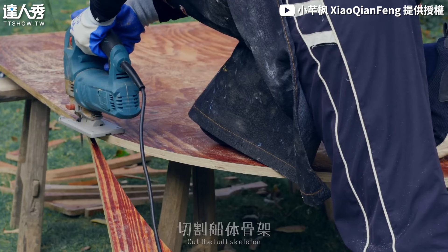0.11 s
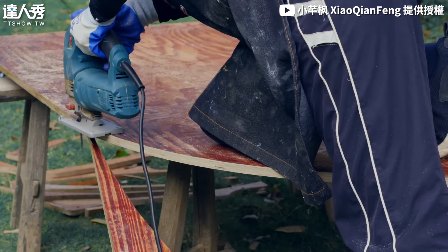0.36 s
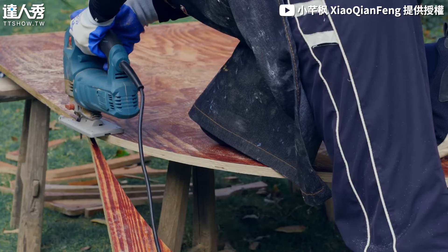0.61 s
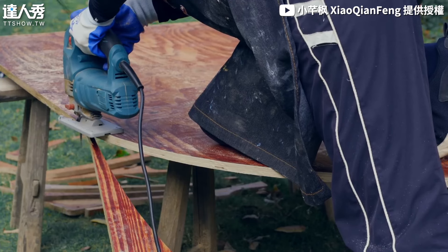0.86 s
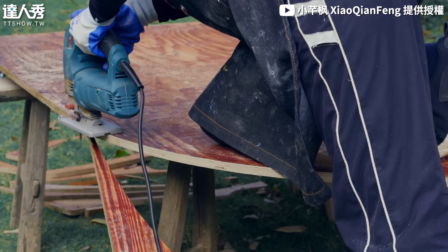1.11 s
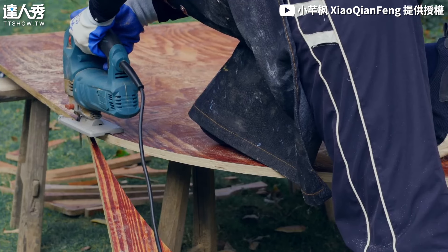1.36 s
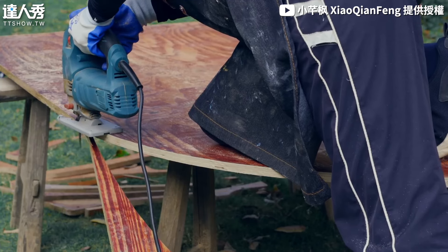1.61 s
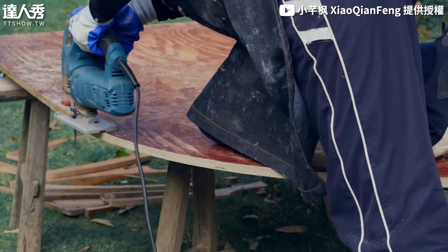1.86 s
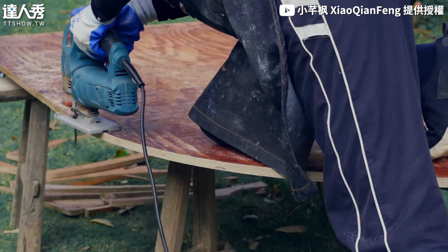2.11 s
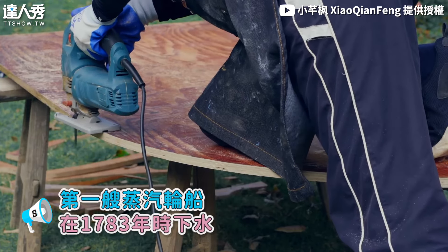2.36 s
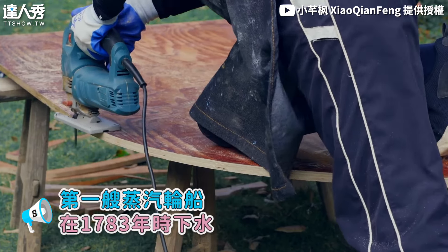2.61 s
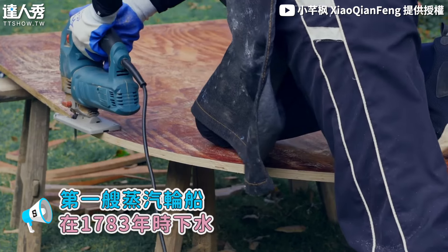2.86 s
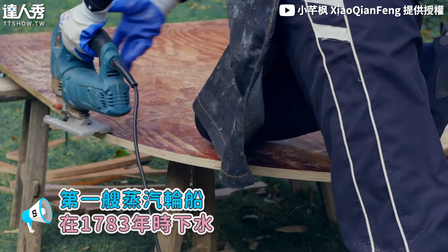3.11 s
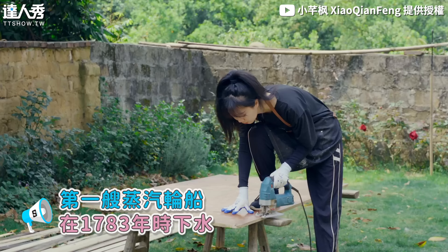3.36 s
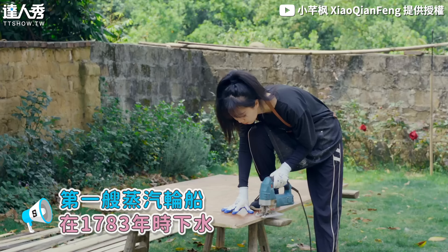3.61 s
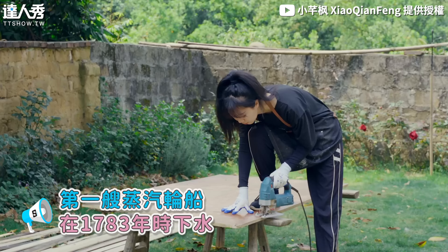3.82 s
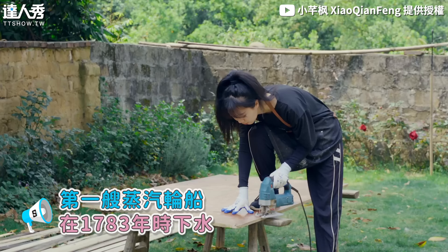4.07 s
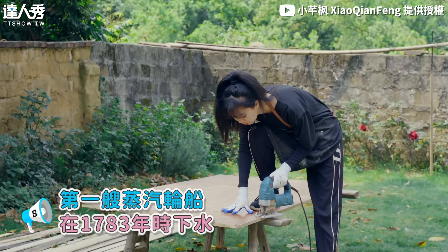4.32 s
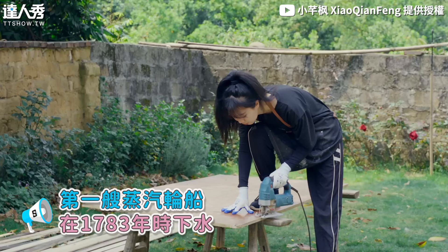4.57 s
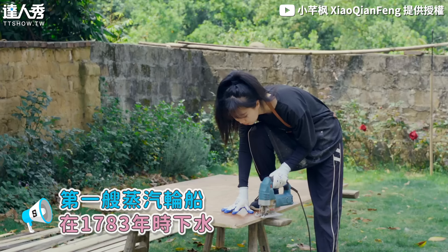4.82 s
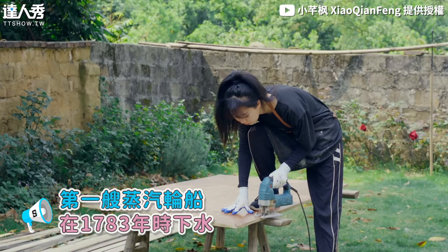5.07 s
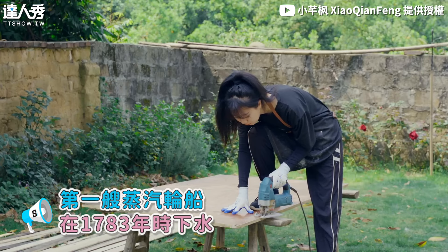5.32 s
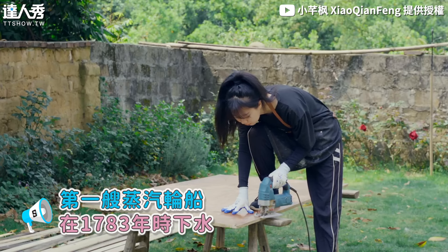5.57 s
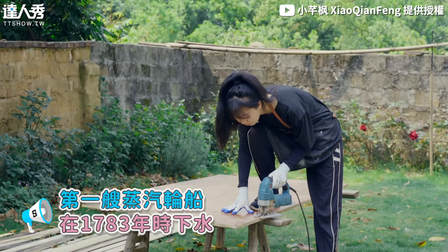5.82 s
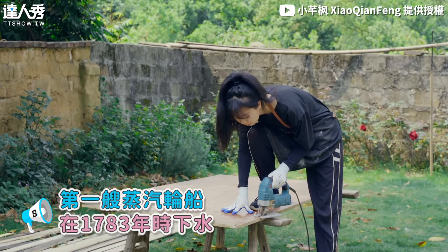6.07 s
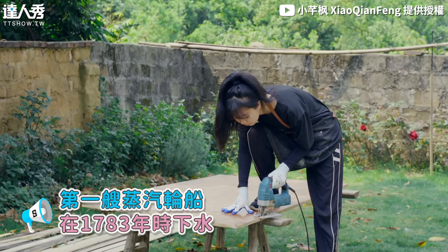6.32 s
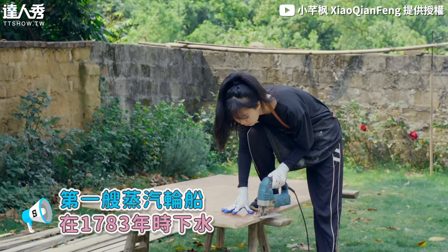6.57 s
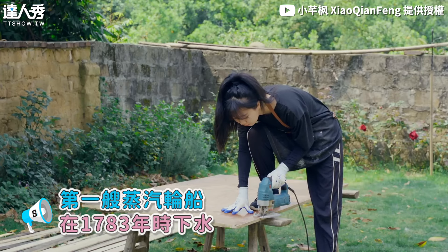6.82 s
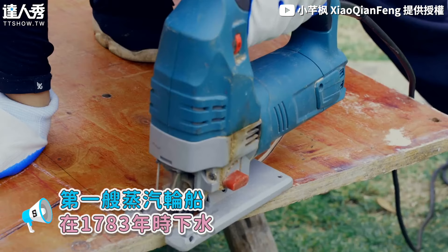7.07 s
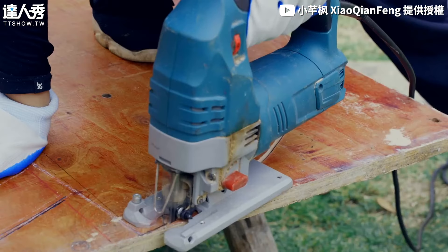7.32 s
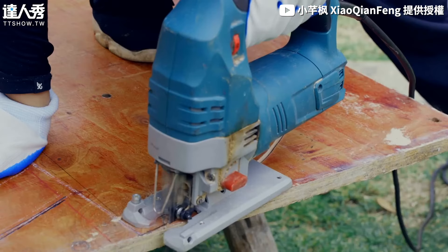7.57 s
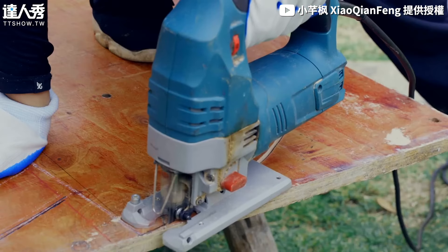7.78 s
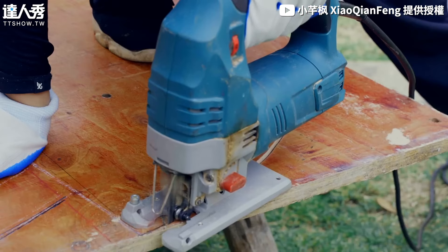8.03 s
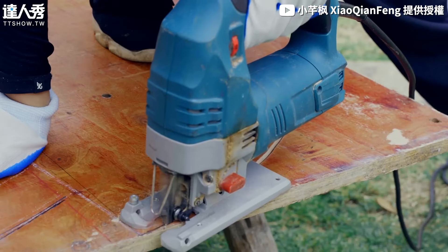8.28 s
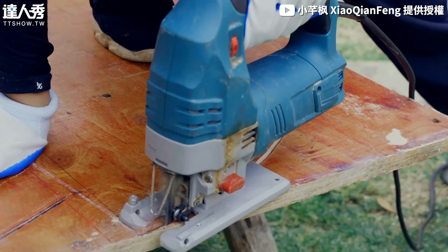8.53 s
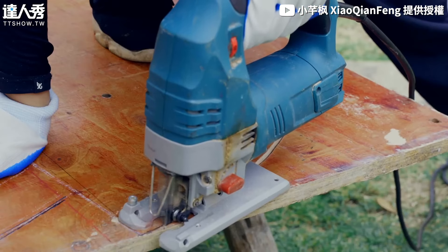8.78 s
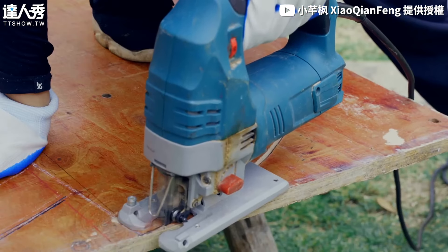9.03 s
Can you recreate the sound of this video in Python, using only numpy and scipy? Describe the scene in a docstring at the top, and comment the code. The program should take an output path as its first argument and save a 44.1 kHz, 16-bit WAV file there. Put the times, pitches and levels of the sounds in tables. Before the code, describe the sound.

An electric jigsaw roars close by, coasts down with rattling base-plate knocks, restarts, slows again, then cuts steadily farther off and finally near.

```python
"""An electric jigsaw cuts a wooden board outdoors, heard in three joined stretches.
Close by, the motor coasts down amid base-plate knocks and restarts, then coasts again while a farther,
steady cut fades in; a hard cut then jumps to a near, steady cut in which the board drones with the strokes.
Noise shaped by teeth and body makes the roar; sines locked to one shaft make stroke drone and whines;
filtered noise bursts make the knocks."""
import sys
import numpy as np
from scipy import signal
from scipy.io import wavfile
from scipy.ndimage import uniform_filter1d

SR = 44100
rng = np.random.default_rng(int(sys.argv[2]) if len(sys.argv) > 2 else 0)


def wrap_up_sound(samples):
    """Save the sound to the file named by the first command line argument, as 16-bit audio."""
    columns = np.atleast_2d(samples).T
    # keep every value between -1 and 1, then stretch to whole-number steps
    tamed = np.clip(columns, -1, 1)
    steps = np.round(tamed * 32767).astype(np.int16)
    wavfile.write(sys.argv[1], SR, steps)


def magnitude_from_level(level_db):
    """Linear magnitude for a level in decibels (20 dB per decade)."""
    exponent = np.asarray(level_db, float) / 20
    return 10 ** exponent


N = 403956  # length in samples
SHAFT_TURNS_PER_STROKE = 86 / 8

# how each stretch reaches the microphones, and its bite, one row a stretch: left_minus_right_db,
# left_lead_samples, stroke_throb (0-1, at running speed), chip_bursts_db (re the steady rasp),
# repeating_pattern_db (re the rasp, at running speed), shaft_twist_turns (peak, twice a stroke)
PLACE = [(-0.8, 0.36, 0.06, -10.5, -5.5, 0.0068), (-1.85, 2.54, 0.16, -16.5, -11, 0.0016),
         (-0.5, .1, 0.14, -9, -7, .002)]
# cutting roar at full speed, one list a stretch: time_s, level_db (1.2-4 kHz, ahead of the dip),
# board_thrum_db (tilt of the bass)
CUT = [
    [(0, -22.5, 1.5), (.3, -22, 1), (.8, -22.5, 1.5), (1.1, -24, 3), (1.65, -23, 1), (1.85, -24.5, 3),
     (2.7, -26, -0.5), (3.3, -22.5, -1)],
    [(2.9, -29.5, 1.5), (3.8, -28.5, -0.5), (4.55, -29, 0), (4.9, -26.5, -2.5), (5.3, -27, -1.5),
     (5.65, -28, 1.5), (6.05, -27, -2), (6.75, -28, -2), (7.09, -28.5, 6)],
    [(7.09, -27.5, 1), (9.16, -28, 2.5)],
]


def evened(x):
    """Scales a signal to unit rms."""
    return x / np.sqrt(np.mean(x ** 2) + 1e-20)


def read(points, hz):
    """Reads a (frequency, value) table along a logarithmic frequency axis."""
    table_hz, value = np.transpose(points)
    return np.interp(np.log(hz + 1), np.log(table_hz + 1), value)


def curve(rows, t):
    """Reads every column of a table against its first, in straight lines."""
    at, *columns = np.transpose(rows)
    return [np.interp(t, at, column) for column in columns]


def drift(n, per_s):
    """Slow chance of about unit spread; a higher per_s wanders faster."""
    knots_per_s = 40
    knots = rng.standard_normal(int(n / SR * knots_per_s) + 80)
    smooth = evened(signal.lfilter([1], [1, -np.exp(-per_s / 6)], knots)[40:])
    return np.interp(np.arange(n) / SR * knots_per_s, np.arange(len(smooth)), smooth)


def later(k, t):
    """Rises from 0 to 1 as the cut moves on from its early to its late sound."""
    # middle of the turn, one a stretch: time_s
    turn_s = (1.1, 5.18, 8.26)
    return .5 + .5 * np.tanh((t - turn_s[k]) / 0.14)


def speed_share(k, t):
    """Share of the running speed: an even proportional loss while coasting, a quick recovery under power."""
    # the trigger is let go in the first stretch: release_s, press_s, loss_rate_per_s (share of speed)
    coasts = [(.1824, .8096, 1.119), (1.97, 3.4, .884)]
    spin_up_s = .134
    share = np.ones(len(t))
    if k > 0:
        return share
    for release_s, press_s, loss_rate in coasts:
        lost = 1 - np.exp(-loss_rate * np.clip(t - release_s, 0, press_s - release_s))
        recovery = np.exp(-np.maximum(t - press_s, 0) / spin_up_s)
        share = share * (1 - lost * recovery)
    return share


def response(k, hz):
    """Gain of the saw and board: broad colour with the resonances standing on it."""
    # colour of the roar, one list a stretch: frequency_hz, density_db (relative)
    colour = [
        [(24, -82), (40, -67), (273, -26.5), (438, -17.5), (670, -13.5), (817, -10.5), (1050, -10.5),
         (2220, -2.5), (3300, -10), (5720, -15.5), (10400, -25.5), (14400, -28), (15500, -32)],
        [(24, -92), (40, -81), (280, -27.5), (397, -22.5), (427, -26), (606, -15.5), (704, -9.5), (1130, -7),
         (1680, -1.5), (5300, -10), (10900, -21.5), (13700, -23), (15500, -23)],
        [(24, -81), (40, -55), (188, -41), (253, -19.5), (301, -27.5), (461, -19), (637, -17.5), (838, -3),
         (1050, -12.5), (2160, -3.5), (10700, -20.5), (14400, -23.5), (15500, -33)],
    ]
    # resonances of board, base plate and housing, one list a stretch: centre_hz, width_hz, peak_db (relative)
    body = [
        [(423.3, 33, -11.5), (812, 44, -8), (1304, 224, -5.5), (1595, 230, -4), (2247, 71, 3), (2885, 180, -5),
         (3490, 68, -9.5), (5810, 130, -12), (7770, 460, -20.5)],
        [(442.5, 15, -12), (820, 150, -13), (1700, 49, -28), (1920, 25, -10), (2196, 280, -0.5),
         (2479, 63, 4.5), (2905, 44, 3), (3420, 160, -6.5), (5240, 130, -5.5)],
        [(251, 18, -19), (444, 21, -29), (880, 90, -9), (1277, 150, -5), (2160, 410, -3), (2650, 62, -8),
         (3220, 99, -4.5), (3600, 110, -3), (3990, 110, -19), (4800, 180, -7), (5680, 1060, -10),
         (7500, 150, -12.5)],
    ]
    peaks = sum(magnitude_from_level(db) ** 2 / (1 + (2 * (hz - f) / width) ** 2) ** 2 for f, width, db in body[k])
    return np.sqrt(magnitude_from_level(read(colour[k], hz) - 4.0) ** 2 + 0.57 * peaks)


def knocks():
    """The base plate knocks on the board while the motor is slow: short bright bursts through the housing."""
    # one row a knock: start_s, level_db (rms at its start)
    blows = [(0.3915, -25), (0.412, -28), (0.4434, -31), (0.5322, -28), (0.5636, -28), (0.5994, -24.5),
             (0.631, -31), (0.8594, -25), (0.8929, -24), (0.9423, -28.5), (0.97, -27)]
    length = 900
    out, t = np.zeros((2, N)), np.arange(length) / SR
    bright = signal.butter(4, [2500, 8500], "band", fs=SR, output="sos")
    decay = magnitude_from_level(-60 * t / 0.028)  # 60 dB in 28 ms
    for start_s, level_db in blows:
        shared = 1.5 * rng.standard_normal(length)
        burst = signal.sosfilt(bright, rng.standard_normal((2, length)) + shared)
        first = round(start_s * SR)
        out[:, first:first + length] += magnitude_from_level(level_db) * evened(burst) * decay
    return out


def tone(turns, db, spread, flutter_db):
    """A sine of wavering level; it reaches the two sides with a different phase (spread in radians)."""
    start = 2 * np.pi * rng.random() + np.array([[0], [spread * rng.standard_normal()]])
    level = np.sqrt(2) * magnitude_from_level(db + flutter_db * drift(len(turns), 4.0))
    return level * np.sin(2 * np.pi * turns + start)


def fan_whine(k, turns, share, t):
    """Each fan blade chops the air once a shaft turn; the whine fades as the shaft slows."""
    # whine ahead of the fade with speed, one list a stretch: time_s, level_db
    fan = [
        [(0, -39), (.1, -37.5), (1.97, -36)],
        [(2.9, -47), (3.6, -50.5), (3.85, -46), (4.08, -56), (4.45, -54.5), (4.7, -66.5), (5.0, -49),
         (5.4, -46), (5.75, -41.5), (6.0, -55), (6.28, -61), (6.6, -37), (7.09, -49)],
        [(7.09, -46), (8.5, -40.5), (9.16, -46)],
    ]
    # fade with speed: speed_share (of full speed), change_db
    fan_by_speed = [(.35, -26), (.55, -18), (.75, -14), (.92, -9), (.98, -5), (1, -2.5)]
    blades = 31
    level_db = curve(fan[k], t)[0] + curve(fan_by_speed, share)[0]
    return tone(blades * turns, level_db, spread=1.0, flutter_db=(2, 2, 1)[k])


def slot_whine(k, turns, shaft_hz):
    """Motor slots sing with overtones, growing as they slide down into the housing resonances."""
    # whine ahead of the housing's change, one a stretch: level_db
    slot_levels = (-51.5, -52, -55)
    # housing: pitch_hz, change_db
    slot_colour = [(2000, 0), (2500, 6), (2800, 15), (3300, 10), (4500, 4), (5200, 1), (5600, 0),
                   (5800, -7)]
    slots = 12
    level_db = slot_levels[k] + read(slot_colour, slots * shaft_hz)
    out = tone(slots * turns, level_db, spread=.3, flutter_db=(.8, 3, 3)[k])
    for order, below_db in ((2, -21), (4, -21), (5, -25)):
        audible = order * slots * shaft_hz < 16000
        out += audible * tone(order * slots * turns, level_db + below_db, spread=0.88, flutter_db=3)
    return out


def drone(k, strokes, shaft_hz, t, swing_db):
    """Stroke harmonics take the colour of the body as they slide; low ones are alike on both sides."""
    # what repeats with every stroke, shaft turn and gear tooth, one list a stretch:
    # multiple (of the stroke rate), early_db, late_db (rms, relative)
    harmonics = [
        [(2, -86, -86), (7, -62, -62), (8, -65, -65), (9, -60, -60), (10, -58, -58), (11, -59, -59),
         (18, -50, -50), (19, -47, -47), (27, -46, -46), (31, -44, -44), (34, -44, -44), (37, -44, -44),
         (45, -47, -47), (52, -37, -37), (71, -47, -47)],
        [(3, -89, -81), (5, -77, -73), (7, -65, -64), (10.75, -54, -55), (11, -61, -59), (12, -67, -60),
         (13, -68, -63), (16, -57, -57), (17, -56, -55), (18, -60, -50), (19, -55, -54), (20, -58, -50),
         (21, -55, -53), (33, -55, -49), (37, -53, -47), (39, -51, -44), (41, -58, -44), (42, -50, -41),
         (44, -48, -48), (48, -40, -47), (52, -42, -45), (54, -44, -46), (58, -63, -44), (61, -45, -44),
         (65, -50, -50), (72, -43, -58), (77, -52, -62), (78, -55, -48), (84, -53, -51), (88, -55, -52)],
        [(3, -80.5, -80.5), (6, -54.5, -58.5), (8, -65.5, -65.5), (9, -63.5, -67.5), (10, -63.5, -65.5),
         (10.75, -55.5, -58.5), (11, -61.5, -60.5), (14, -58.5, -63.5), (19, -39.5, -44.5), (20, -44.5, -41),
         (21, -50.5, -48.5), (23, -52.5, -50.5), (30, -44.5, -48), (32, -51.5, -50.5), (35, -66.5, -54.5),
         (36, -57.5, -54.5), (41, -50.5, -58.5), (45, -48.5, -49.5), (47, -48.5, -51.5), (58, -49.5, -46.5),
         (79, -66.5, -54.5), (86, -50.5, -52.5), (91, -55.5, -59.5), (172, -64.5, -59.5)],
    ]
    out, grid_hz = 0, np.geomspace(20, 16000, 600)
    colour_db = 20 * np.log10(response(k, grid_hz))
    for multiple, early_db, late_db in harmonics[k]:
        hz = multiple * shaft_hz / SHAFT_TURNS_PER_STROKE
        usual_db = np.interp(np.percentile(hz, 75), grid_hz, colour_db)
        slide_db = np.interp(hz, grid_hz, colour_db) - usual_db
        level_db = early_db + (late_db - early_db) * later(k, t)
        level_db = level_db + swing_db + 1.5 + np.minimum(slide_db, 3)
        spread = min(multiple / 40, .9)
        out = out + tone(multiple * strokes, level_db, spread, flutter_db=(3.5, 2.5, 1.3)[k])
    return out


def teeth(k, strokes, slowing):
    """Excitation: rasp that throbs twice a stroke, bursts of chips, and a pattern that each stroke repeats."""
    n, (throb, chip_db, pattern_db) = len(strokes), PLACE[k][2:5]
    depth = np.clip(throb + .5 * slowing, 0, .9)  # slow strokes stand out singly
    bite = 1 + depth * np.cos(4 * np.pi * strokes + .5 * drift(n, 4))
    bite += .05 * np.cos(2 * np.pi * strokes)
    struck = rng.random(n) < 300 / SR  # about 300 chips a second
    snaps = magnitude_from_level(2.3 * np.minimum(rng.exponential(1, n), 3)) * struck
    chips = evened(signal.lfilter([1], [1, -np.exp(-1 / (0.0012 * SR))], snaps))  # 1.2 ms decay
    rasp = rng.standard_normal(n) * (bite + magnitude_from_level(chip_db) * chips) * magnitude_from_level(.5 * drift(n, 16))
    pattern = rng.standard_normal(1024)[(strokes % 1 * 1024).astype(int)]
    return evened(rasp) + magnitude_from_level(pattern_db - 27 * slowing) * pattern


def coloured(k, a, b, t, patchy_db):
    """Two excitations become left and right, through the body.

    Thrum follows its own curve with slow wander; hiss falls with motor speed and mostly ignores
    the cutting level."""
    # likeness of left and right, one list a stretch: frequency_hz, likeness (0-1)
    likeness = [
        [(60, 0.99), (130, 0.98), (290, 1), (640, 0.78), (1410, 0.53), (3100, 0.47), (6820, 0.37), (15000, 0)],
        [(60, 0.65), (130, 1), (290, 0.82), (640, 0.78), (1410, 0.21), (3100, 0.51), (6820, 0), (15000, 0)],
        [(60, 0.95), (130, 1), (290, 0.99), (640, 0.97), (1410, 0.72), (3100, 0.75), (6820, 0.7), (15000, 0.16)],
    ]
    # midway through the far stretch the saw reaches another part of the board: frequency_hz, change_db
    move = [(60, 1), (110, 7), (200, 2), (400, -1), (600, -3), (720, 3.5), (900, -0.5), (1300, 0.5),
            (1560, -1), (1690, 4), (1800, -1.5), (1935, -1.5), (2090, 0), (2300, 0), (2450, 0), (2900, -1),
            (3500, 0.5), (6000, 0)]
    hiss_db_per_octave = 7.5  # further loss of cooling air hiss per octave of lost speed
    hiss_steady = 0.79  # share of the changes in cutting level that the air hiss ignores
    thrum_wander_db = 0.97
    hop = 256
    air = rng.standard_normal((2, len(t)))
    hz, frame_s, z = signal.stft([a, b, *air], SR, nperseg=1024, noverlap=1024 - hop)
    low, high = 1 / (1 + (hz / 1100) ** 4), 1 / (1 + (5000 / (hz + 1)) ** 4)
    steady = np.clip(0.41 * high, 0, 1)[:, None]  # air hiss does not follow the teeth
    za, zb = np.sqrt(1 - steady) * z[:2] + np.sqrt(steady) * z[2:]

    at = t[0] + frame_s
    cut_db, thrum_db = curve(CUT[k], at)
    thrum_db = thrum_db + thrum_wander_db * drift(len(at) * hop, 2.3)[::hop]
    hiss_db = hiss_db_per_octave * np.log2(speed_share(k, at)) - hiss_steady * cut_db
    tilt_db = np.outer(low, thrum_db) + np.outer(high, hiss_db - hiss_db.mean())
    if k == 1:
        tilt_db += np.outer(read(move, hz), later(k, at) - .5)
    patches = rng.standard_normal(za.shape[::-1])
    patches = evened(uniform_filter1d(uniform_filter1d(patches, 25, 0), 6, 1)).T

    same = np.clip(read(likeness[k], hz), 0, 1)[:, None]
    delay = np.exp(-2j * np.pi * hz * PLACE[k][1] / SR)[:, None]
    z = np.array([za, delay * (same * za + np.sqrt(1 - same ** 2) * zb)])
    z *= response(k, hz)[:, None] * magnitude_from_level(tilt_db + patchy_db * patches)
    return signal.istft(z, SR, nperseg=1024, noverlap=1024 - hop)[1][:, :len(t)]


def cutting_roar(k, strokes, slowing, t, load_db):
    """Teeth tear the wood through the body; the level is set by the load in the 1.2-4 kHz band."""
    left, right = teeth(k, strokes, slowing), teeth(k, strokes, slowing)
    roar = coloured(k, left, right, t, patchy_db=1.0)
    middle = signal.butter(4, [1200, 4000], "band", fs=SR, output="sos")
    band = signal.sosfilt(middle, roar.mean(0))
    return roar / band.std() * magnitude_from_level(load_db)


def stretch(k):
    """One continuous run of the saw: roar, stroke drone and motor whines on one shaft speed."""
    # shaft speed with the trigger held, sagging under load, one list a stretch: time_s, shaft_hz
    running = [
        [(0, 469.7), (1.045, 454.1), (1.77, 473.8), (1.97, 483.2)],
        [(2.9, 432.2), (3.6, 434.5), (4.1, 433.2), (4.5, 433.9), (5.2, 429.9), (5.65, 431.4), (6.05, 429.6),
         (6.4, 429.8), (7.09, 432.2)],
        [(7.09, 460.7), (7.5, 462.0), (8.1, 461.0), (9.16, 460.0)],
    ]
    roar_db_per_octave = 5  # loss of roar per octave of lost speed
    first = round(CUT[k][0][0] * SR)
    t = np.arange(first, min(round(CUT[k][-1][0] * SR) + 200, N)) / SR
    share = speed_share(k, t)
    shaft_hz = curve(running[k], t)[0] * share
    turns = np.cumsum(shaft_hz * (1 + .0006 * drift(len(t), 20))) / SR
    strokes, slowing = turns / SHAFT_TURNS_PER_STROKE, 1 - shaft_hz / shaft_hz.max()
    # each bite brakes the shaft
    turns = turns + PLACE[k][5] * np.sin(4 * np.pi * strokes + drift(len(t), 6))
    load_db = curve(CUT[k], t)[0] + roar_db_per_octave * np.log2(share)
    swing_db = load_db - np.percentile(load_db, 75) - 15 * slowing
    out = cutting_roar(k, strokes, slowing, t, load_db)
    out += drone(k, strokes, shaft_hz, t, swing_db)
    out += fan_whine(k, turns, share, t)
    out += slot_whine(k, turns, shaft_hz)
    return first, out * magnitude_from_level(PLACE[k][0] * np.array([[.5], [-.5]]))


def scene():
    """The first stretch cross-fades into the second; the third replaces it at once."""
    # cross-fade: start_s, end_s
    fade_s = (2.886, 3.41)
    # everything dims at the first join: time_s, change_db
    dip = [(2.7, 0), (3.0, -7), (3.2, -9.5), (3.8, 0.5)]
    mix, t = knocks(), np.arange(N) / SR
    share = np.clip((t - fade_s[0]) / (fade_s[1] - fade_s[0]), 0, 1)
    fades = (np.sqrt(1 - share), np.sqrt(share), np.ones(N))
    starts, sounds = zip(*(stretch(k) for k in range(3)))
    for start, sound, fade in zip(starts, sounds, fades):
        stop = start + sound.shape[1]
        kept = mix[:, start:stop] * (start < starts[2])  # the hard cut keeps nothing
        mix[:, start:stop] = kept + sound * fade[start:stop]
    return mix * magnitude_from_level(curve(dip, t)[0])


def roll_off(x):
    """The treble ends steeply here."""
    return signal.sosfilt(signal.butter(12, 15770, fs=SR, output="sos"), x)


def record(dry):
    """The microphone cuts the bass below 70 Hz."""
    thin = signal.sosfilt(signal.butter(2, 70, "high", fs=SR, output="sos"), dry)
    return roll_off(thin)


dry = scene()
out = record(dry)
wrap_up_sound(out)
```